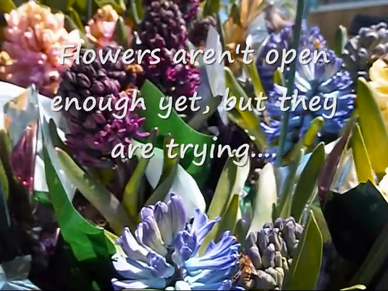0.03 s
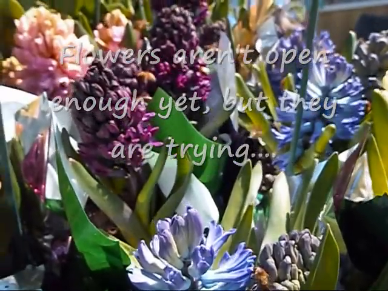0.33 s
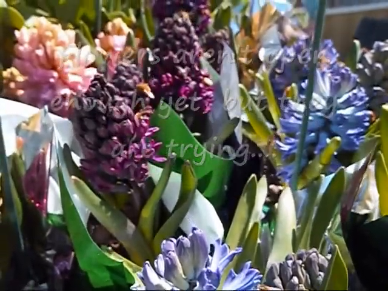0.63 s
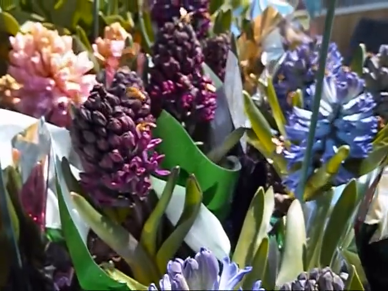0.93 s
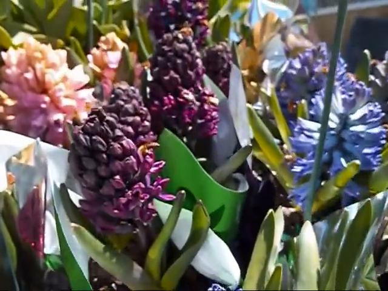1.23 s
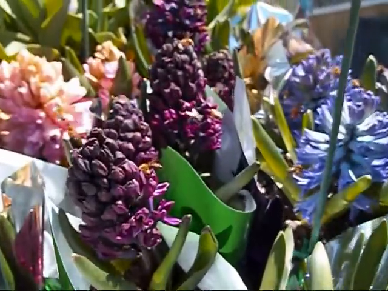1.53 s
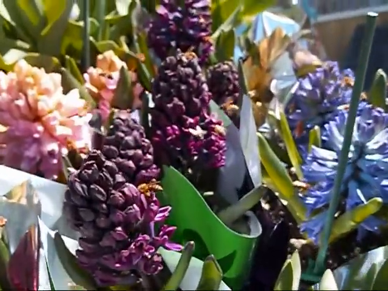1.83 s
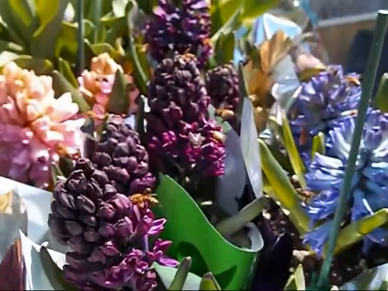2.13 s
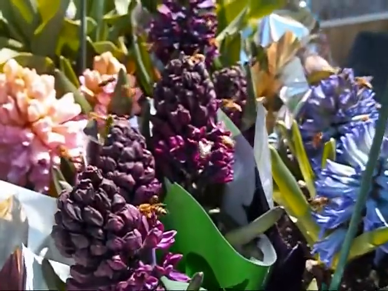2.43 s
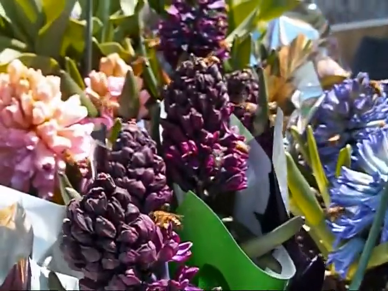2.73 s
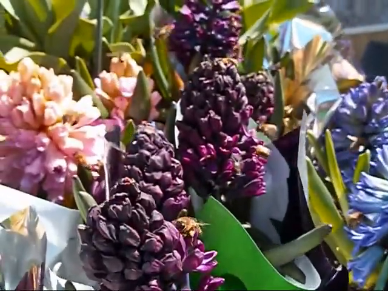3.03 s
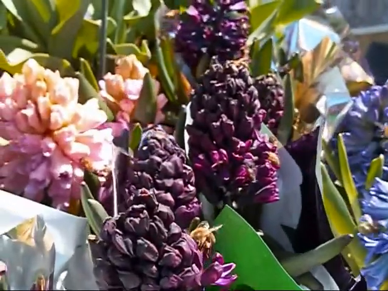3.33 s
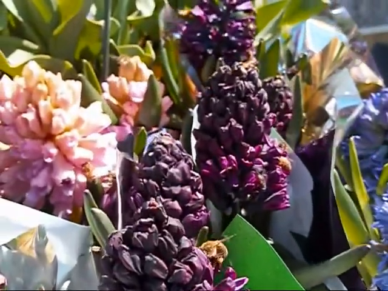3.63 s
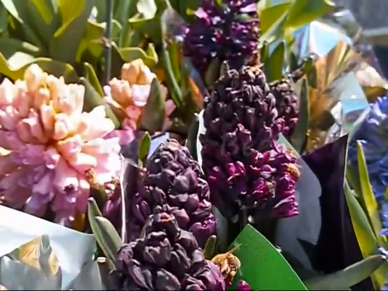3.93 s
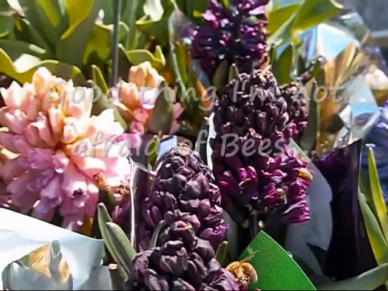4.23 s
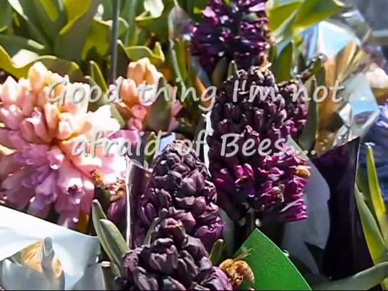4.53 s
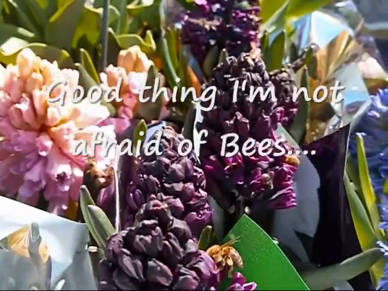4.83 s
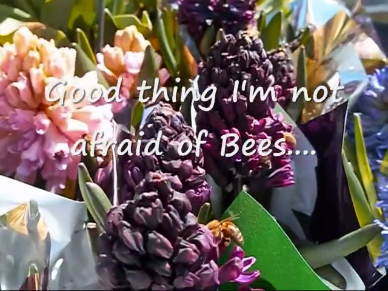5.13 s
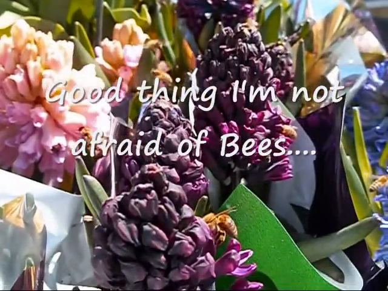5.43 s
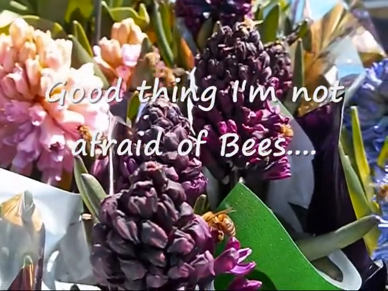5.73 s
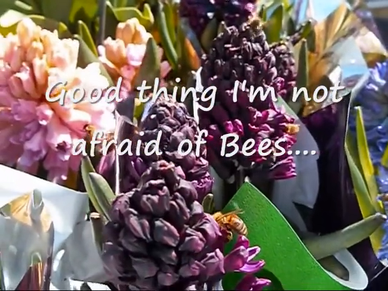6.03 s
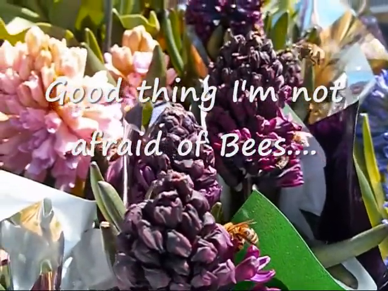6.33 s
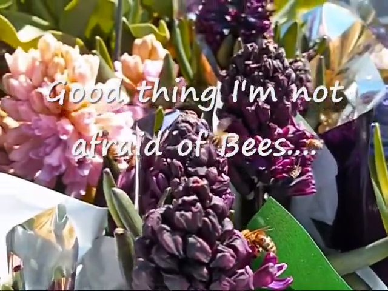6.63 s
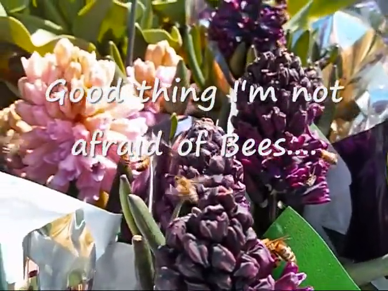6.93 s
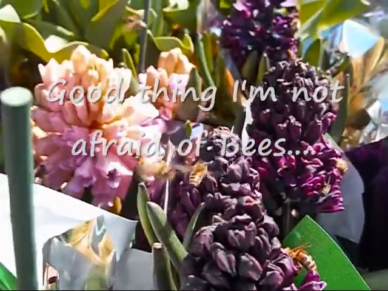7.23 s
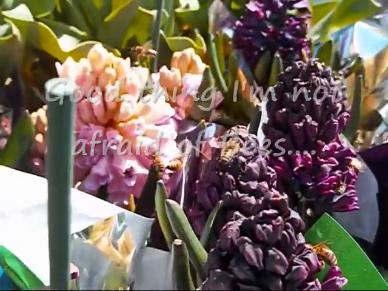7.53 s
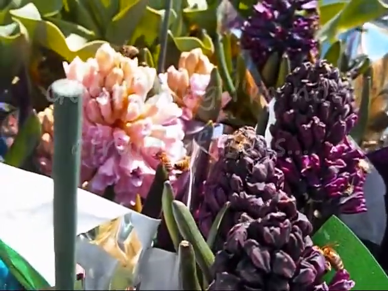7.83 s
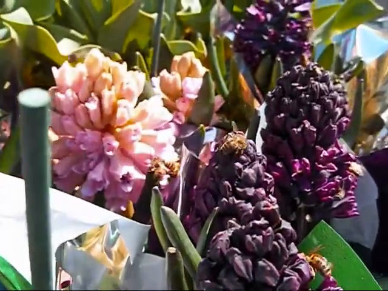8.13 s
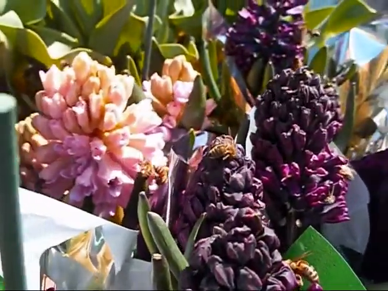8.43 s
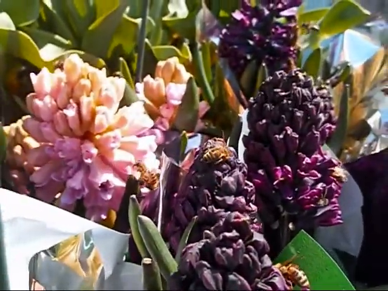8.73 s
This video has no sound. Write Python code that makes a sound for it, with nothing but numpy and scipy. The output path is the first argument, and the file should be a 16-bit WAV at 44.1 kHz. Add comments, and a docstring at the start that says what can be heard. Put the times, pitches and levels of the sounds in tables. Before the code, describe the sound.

Honeybees weave past through a steady hum of others, while plastic flower wrapping snaps and wind thumps now and then.

```python
"""Honeybees in the hyacinths

Two bees weave close to the microphone through the hum of many more, each buzz a repeating wing stroke.
The flowers' plastic wrapping rustles and squeaks under the leaves and snaps as it buckles; the sharpest
snaps overload the recorder. Puffs of wind buffet the microphone, and a machine drones far off."""
import sys
import numpy as np
from scipy import signal
from scipy.fft import rfft, irfft, next_fast_len
from scipy.io import wavfile
from scipy.ndimage import map_coordinates

SR = 44100
rng = np.random.default_rng(int(sys.argv[2]) if len(sys.argv) > 2 else 0)


def master(y):
    """Save y as 16-bit WAV."""
    cut = np.clip(np.atleast_2d(y).T, -1, 1)
    pcm = np.round(cut * 32767)  # scale
    wavfile.write(sys.argv[1], SR, pcm.astype(np.int16))


N = 391608

# Table levels are relative: each layer sets its own gain.
# overtones of a wingbeat: f/Hz, level/dB
WING_TONE = [(250, 0), (500, 2.5), (720, -4), (1000, -4.5), (1250, -8.5), (1550, -15), (1800, -21.5),
             (2100, -20), (2500, -21), (3200, -24), (4000, -29), (5500, -39)]
# upper overtones, heard when a bee faces the microphone: f/Hz, level/dB
RASP_TONE = [(700, -5), (1500, -19.5), (2100, -17), (2450, 3), (2850, -4), (3300, -2), (3900, -13),
             (4600, -14.5), (5600, -23)]
# the near bees between passes, by bee: wingbeat/Hz, climb/(Hz/s), hum/dB, rasp/dB
CRUISE = {"low": (231, 1.89, -52.5, -72), "high": (265, 0.34, -53, -73)}
# fly-bys: bee, t/s, half length/s, wingbeat/Hz, hum/dB, rasp/dB
FLYBYS = [("high", .12, 0.2007, 263, -48.5, -73), ("low", .36, .12, 233, -43, -56),
          ("low", .58, .07, 243, -44.5, -55.5), ("low", 0.842, .09, 229, -44.5, -56),
          ("low", 1.0, 0.081, 238, -46, -58), ("low", 1.27, .12, 236, -44, -62),
          ("low", 1.72, .09, 237, -43.5, -61), ("low", 2.4, .13, 236, -48.5, -68.5),
          ("high", 3.2, .13, 267, -42.5, -58), ("low", 3.4, .16, 242, -45.5, -58.5),
          ("low", 4.15, .13, 240, -46.5, -54), ("high", 4.55, .14, 264, -45.5, -64),
          ("high", 5.08, .06, 274, -33.5, -54), ("low", 5.38, .12, 234, -44, -62),
          ("low", 5.97, .12, 246, -45, -59), ("high", 6.6, .2, 260, -43, -66.5),
          ("low", 7.15, .25, 240, -42.5, -63), ("high", 7.9, .11, 273, -42, -58.5),
          ("high", 8.24, .05, 274, -42.5, -56), ("low", 8.44, .08, 258, -39, -53),
          ("high", 8.67, .08, 278, -40, -50.5), ("high", 8.83, .08, 270, -44, -47.5)]
# fader curve of the bees further off: t/s, level/dB
SWARM_LEVEL = [(0.0, -44.5), (2.55, -44.5), (3.09, -41.5), (5.84, -40.5), (6.08, -39.5), (7.69, -41),
               (8.01, -39.5), (8.88, -39.5)]
# snaps of the wrapping: t/s, level/dB, tilt/(dB/octave)
SNAPS = [(0.1521, -28, -3), (1.4228, -32, -7), (2.1973, 7.5, 2.5), (2.2008, -6, -15), (2.4543, -30.5, -10),
         (3.0149, -32, 10), (3.2284, 3.5, -2.5), (3.2425, -15, -19), (3.4195, -6.5, -0.5), (3.874, -30, 6),
         (4.8774, -16.5, -12.5), (5.1712, -28.5, -15), (5.442, -21, -15), (8.0614, -17, -4),
         (8.0801, 0.5, -0.5), (8.110, -25, -10), (8.1182, -19.5, -17.5)]
# ringing modes of the plastic: f/Hz, level/dB, t60/s
PLASTIC_MODES = [(1020, -32.5, 0.014), (1480, -24, 0.016), (1856, -12.5, 0.02), (2273, -9.5, 0.017),
                 (2620, -9.5, .012), (2830, -8.5, 0.005), (3250, -11, 0.0094), (3922, -0.5, 0.0093),
                 (4560, -9.5, 0.015), (5500, -24, 0.013)]
# colour of the rustling film: f/Hz, level/dB
RUSTLE_TONE = [(300, -16), (1200, -5.5), (2000, 0.5), (2700, 5), (3400, 0.5), (4200, -1.5), (5100, -2),
               (5800, -9)]
# leaves brush the wrapping: t/s, level/dB, rise/s, fall/s
BRUSHES = [(2.09, -52, .04, .025), (2.9, -46.5, .33, .28), (3.27, -48, .02, .1), (3.6, -54, 0.32, 0.34),
           (4.04, -50.5, .04, 0.071), (6.14, -56.5, 1, 1), (8.2, -50.5, 0.11, 0.21)]
# resonances of the taut film: f/Hz, width/Hz, level/dB
SQUEAK_MODES = [(3970, 550, 0), (5170, 700, -4.5)]
# colour of wind on the microphone: f/Hz, level/dB
BUFFET_TONE = [(10, -10), (28, 2), (60, -4), (110, -10), (200, -18), (320, -28.5), (500, -37),
               (1000, -52.5), (3000, -89.5)]
# puffs of wind: t/s, level/dB, half length/s
GUSTS = [(0.085, -31, 0.12), (0.455, -42.5, 0.034), (0.844, -40.5, 0.22), (1.327, -37, .05),
         (5.03, -37, 0.12), (5.275, -38, .04), (5.45, -37, .04), (6.203, -20.5, 0.086), (6.318, -19, 0.082),
         (6.602, -26, 0.21), (6.838, -26, .045), (7.149, -37.5, .035)]
# the hardest eddies and nudges thump the microphone: t/s, level/dB, f/Hz
THUMPS = [(0.102, -27, 60), (.182, -33, 130), (0.439, -28, 44.5), (1.319, -32, 85), (2.457, -36, 270),
          (5.78, -30, 69.7), (5.815, -29, 71.4), (6.194, -19, 59.8), (6.209, -18, 152), (6.307, -15, 119),
          (6.323, -12.5, 69.1), (6.335, -14.5, 140), (6.367, -21, 171), (6.878, -21.5, 91),
          (8.199, -33.5, 141)]
# partials of the far machine: f/Hz, level/dB
DRONE_PARTIALS = [(59.2, -41), (118.4, -55.5)]
# colour of the outdoor air: f/Hz, level/dB
AIR_TONE = [(20, 1), (45, 4), (90, -6), (170, -7), (350, -13), (620, -12.5), (1000, -10), (1450, -15),
            (1900, -24.5), (2700, -22), (4000, -25.5), (5600, -27.5)]

CLOCK = np.arange(0, N / SR, .002)  # control-rate times for flights and swells, t/s


def near_bee(bee, gain_db, rasp_gain_db, tilt_db, flutter_db, leaves_db):
    """A close bee; reflections make each overtone swell and fade as its pitch moves."""
    beat_hz, hum_gain, rasp_gain = flight(bee)
    beat_hz = unsteady(beat_hz)
    hum = wings(beat_hz, WING_TONE, tilt_db, turn_rate=14) * hum_gain * amp(gain_db)
    rasp = wings(beat_hz, RASP_TONE, tilt_db, turn_rate=12) * rasp_gain
    rasp *= amp(rasp_gain_db + 2.6 * wobble(16))  # beamed, so it comes in short surges
    buzz = (hum + rasp) * amp(flutter_db * wobble(24))
    return buzz + amp(leaves_db) * scattered(buzz, t60=0.22)


def flight(bee):
    """Wingbeat, hum gain and rasp gain of a cruising bee; fly-bys swell the hum as one over distance."""
    start_hz, climb, hum_db, rasp_db = CRUISE[bee]
    beat_hz = start_hz + climb * CLOCK
    hum_power, rasp_power = amp(hum_db) ** 2, amp(rasp_db) ** 2
    for who, s, half, pass_hz, pass_hum_db, pass_rasp_db in FLYBYS:
        if who == bee:
            near = 1 / (1 + ((CLOCK - s) / half) ** 2)
            closest = near * near  # pitch bend and rasp keep to the closest stretch
            beat_hz += closest * (pass_hz - beat_hz)
            hum_power += near * amp(pass_hum_db) ** 2
            rasp_power += closest * amp(pass_rasp_db) ** 2
    return per_sample(beat_hz), per_sample(np.sqrt(hum_power)), per_sample(np.sqrt(rasp_power))


def unsteady(beat_hz, waver=.0135, jitter=.007):
    """Steering moves make the wingbeat waver, and no two strokes last quite alike."""
    return beat_hz * (1 + waver * wobble(26) + jitter * wobble(170))


def wings(beat_hz, spectrum, tilt_db, turn_rate, count=22, size=1024):
    """One bee's buzz: a wing stroke looped at the wingbeat rate, changing shape as the bee turns."""
    hz = np.arange(1, count + 1) * np.mean(beat_hz)
    overtones = amp(along(spectrum, hz) + tilt_db * np.log2(hz / hz[1]))
    # two wavetables: the stroke from the front and from the side
    phases = np.exp(2j * np.pi * rng.random((2, count)))
    front, side = irfft(np.pad(overtones * phases, ((0, 0), (1, 0))), size)
    place = np.cumsum(beat_hz) / SR % 1 * size
    looped = lambda stroke: np.interp(place, np.arange(size + 1), np.append(stroke, stroke[0]))
    heading = wobble(turn_rate)
    return unit(np.cos(heading) * looped(front) + np.sin(heading) * looped(side))


def swarm(spread, drift, roam_db, gain_db, count=10, start_hz=237.9, climb_hz_per_s=2.2):
    """A bed of further bees: each has its own wingbeat and drifts nearer and away among the flowers."""
    t = np.arange(N) / SR
    mean_hz = start_hz + climb_hz_per_s * t
    fader_db = np.interp(t, *np.transpose(SWARM_LEVEL))
    hum = np.zeros(N)
    for offset in np.linspace(-1, 1, count):
        beat_hz = unsteady(mean_hz * (1 + spread * offset + drift * wobble(7)))
        hum += wings(beat_hz, WING_TONE, tilt_db=1.0, turn_rate=4) * amp(roam_db * wobble(6))
    return unit(hum) * amp(fader_db + gain_db)


def snaps(crack_db, crack_t60, rise_s, scatter_db, scatter_t60):
    """The plastic buckles: a thin crack, a brief ring, and a faint scatter from the pots around."""
    track, t = np.zeros(N), np.arange(SR // 8) / SR
    hz, mode_db, t60 = np.transpose(PLASTIC_MODES)[:, :, None]
    for s, db, tilt_db in SNAPS:
        strength = amp(mode_db + tilt_db * np.log2(hz / hz.mean()) + rng.normal(0, 1, hz.shape))
        detuned = hz * (1 + rng.normal(0, 0.0185, hz.shape))
        modes = np.sin(2 * np.pi * (detuned * t + rng.random(hz.shape)))
        ring = np.sum(strength * amp(-60 * t / t60) * modes, axis=0) / np.linalg.norm(strength)
        # so small a sheet radiates little bass
        crack = signal.lfilter([1, -.75], 1, rng.standard_normal(len(t)))
        crack *= amp(crack_db + tilt_db - 60 * t / crack_t60)  # brighter snaps crack harder
        snap = (ring + crack) * (1 - np.exp(-t / rise_s))
        add(track, s, amp(db) * (snap + amp(scatter_db) * scattered(snap, scatter_t60)))
    return track


def knocks(knock_db, knock_hz):
    """Every snap also jolts the pot: one dull push."""
    track, t = np.zeros(N), np.arange(SR // 50) / SR
    phase = 2 * np.pi * knock_hz * t
    push = phase * (2 - phase) * np.exp(-phase)
    for s, db, _ in SNAPS:
        add(track, s, amp(db + knock_db) * push)
    return track


def rustle(grain_db, gain_db, stir_db=-62):
    """Leaves slide over the thin film: a fine, grainy hiss that never quite settles."""
    level = np.hypot(amp(stir_db), swells(BRUSHES))
    grains = unit(noise(RUSTLE_TONE) * amp(grain_db * wobble(300)))
    return grains * level * amp(gain_db)


def squeak(start_s, end_s, fade_s, gain_db):
    """A leaf drags on the taut film, and friction feeds two narrow resonances."""
    film = lambda f: sum(amp(db) / (1 + (2 * (f - hz) / width) ** 2) for hz, width, db in SQUEAK_MODES)
    t = np.arange(N) / SR
    drag = np.clip(np.minimum(t - start_s, end_s - t) / fade_s, 0, 1)
    return unit(filtered(rng.standard_normal(N), film)) * drag * amp(gain_db)


def scattered(x, t60):
    """The short, diffuse reverb of leaves, pots and wrapping."""
    t = np.arange(SR // 8) / SR
    echoes = rng.standard_normal(len(t)) * amp(-60 * t / t60)
    return signal.fftconvolve(x, echoes / np.linalg.norm(echoes))[:len(x)]


def wind():
    """Low buffeting in puffs, with single eddies that push and pull the diaphragm once."""
    level = swells([(s, db, half, half) for s, db, half in GUSTS])
    buffet = noise(BUFFET_TONE) * level * amp(1.0 + 1.5 * wobble(25))
    t = np.arange(-SR // 20, SR // 20) / SR
    for s, db, hz in THUMPS:
        phase = 2 * np.pi * hz * t
        add(buffet, s + t[0], -amp(db + 10) * phase * np.exp(-phase ** 2 / 2))
    return buffet


def far_machine():
    """A distant drone: a low note and its octave, slightly unsteady in pitch and level."""
    t = np.arange(N) / SR
    drone = sum(amp(db) * np.sqrt(2) * np.sin(2 * np.pi * hz * t + .25 * wobble(3))
                for hz, db in DRONE_PARTIALS)
    return drone * amp(0.48 * wobble(4))


def outdoor_air():
    """A soft bed of open-air noise, gently breathing."""
    return noise(AIR_TONE) * amp(-44.5 + 0.76 * wobble(2.1))


def amp(db):
    """Decibels to linear gain."""
    return 10 ** (np.asarray(db) / 20)


def unit(x):
    """Scaled to rms 1."""
    return x / np.sqrt(np.mean(x ** 2) + 1e-20)


def along(points, hz):
    """Read a curve of (f/Hz, level/dB) points on a log frequency axis."""
    f, db = np.transpose(points)
    return np.interp(np.log(hz + 1), np.log(f + 1), db)


def wobble(rate, step=64):
    """A smooth random modulator, rate knots a second."""
    at = np.arange(0, N + step, step)
    knots = rng.standard_normal(4096)
    return np.interp(np.arange(N), at, map_coordinates(knots, [at * rate / SR], mode="mirror"))


def filtered(x, response):
    """EQ x with a gain given as a function of frequency."""
    size = next_fast_len(N + SR // 2)
    return irfft(rfft(x, size) * response(np.fft.rfftfreq(size, 1 / SR)), size)[:N]


def noise(spectrum):
    """Coloured noise of rms 1."""
    return unit(filtered(rng.standard_normal(N), lambda hz: amp(along(spectrum, hz))))


def add(track, s, sound):
    """Mix a sound in at time s."""
    part = track[max(round(s * SR), 0):][:len(sound)]
    part += sound[:len(part)]


def per_sample(slow):
    """From control rate to one value per sample."""
    return np.interp(np.arange(N) / SR, CLOCK, slow)


def swells(rows):
    """One envelope from (t/s, level/dB, rise/s, fall/s) events, each growing and dying away."""
    power = sum(amp(db) ** 2 * np.exp(-2 * np.abs(CLOCK - s) / np.where(CLOCK < s, rise, fall))
                for s, db, rise, fall in rows)
    return per_sample(np.sqrt(power + 1e-20))


def scene():
    """Bees in front; wrapping, wind, machine and air around them."""
    bees = near_bee("low", gain_db=-3, rasp_gain_db=-1.5, tilt_db=-0.5, flutter_db=2.5, leaves_db=-9.5)
    bees += near_bee("high", gain_db=-4.5, rasp_gain_db=-0.5, tilt_db=0.5, flutter_db=3, leaves_db=-14.5)
    bees += swarm(spread=.08, drift=.022, roam_db=2.5, gain_db=-0.5)
    wrapping = rustle(grain_db=3.5, gain_db=3.5)
    wrapping += squeak(start_s=3.28, end_s=3.77, fade_s=0.041, gain_db=-54)
    wrapping += knocks(knock_db=-16, knock_hz=420)
    wrapping += snaps(crack_db=-2, crack_t60=0.013, rise_s=0.00018, scatter_db=-28, scatter_t60=.05)
    return bees + wrapping + wind() + far_machine() + outdoor_air()


def record(dry, band_hz=5700, top_hz=13500):
    """A narrow-band mono recorder; snaps beyond full scale clip and splash into the treble."""
    narrow = filtered(dry, lambda hz: 1 / np.sqrt(1 + (hz / band_hz) ** 90))
    clipped = np.clip(narrow, -1, 1)
    return filtered(clipped, lambda hz: 1 / np.sqrt(1 + (hz / top_hz) ** 30))[None]


dry = scene()
out = record(dry)
master(out)
```